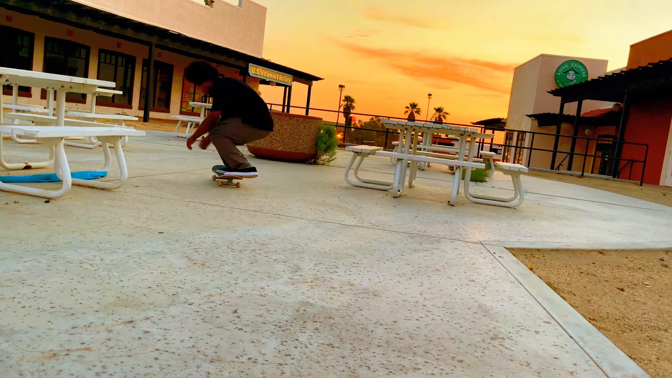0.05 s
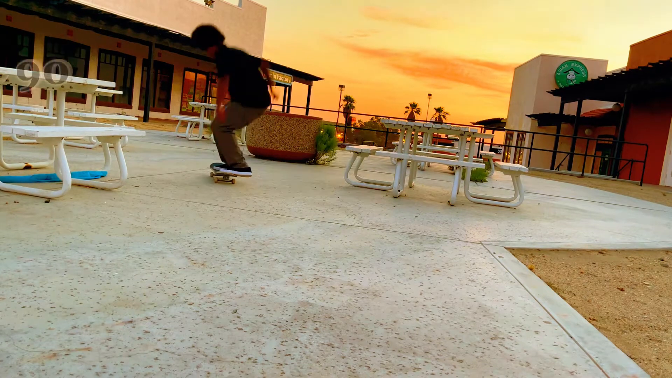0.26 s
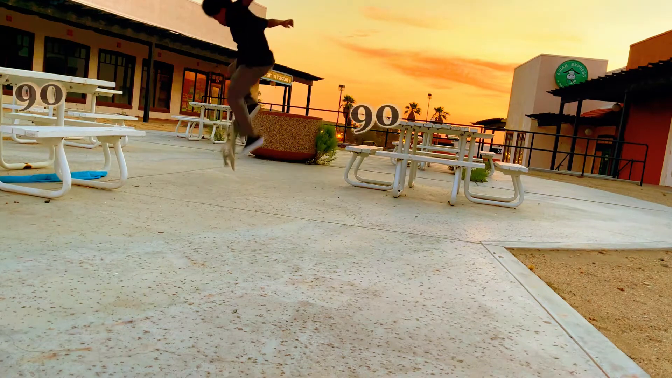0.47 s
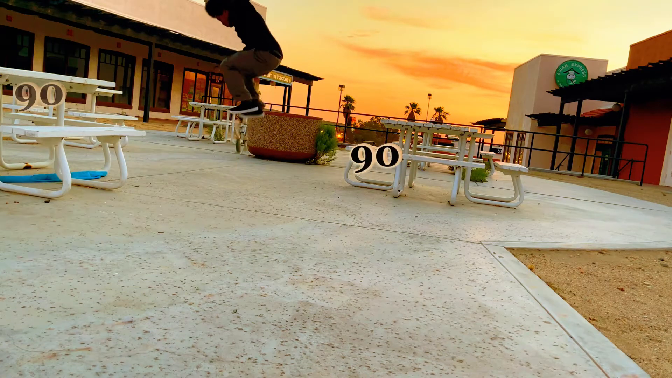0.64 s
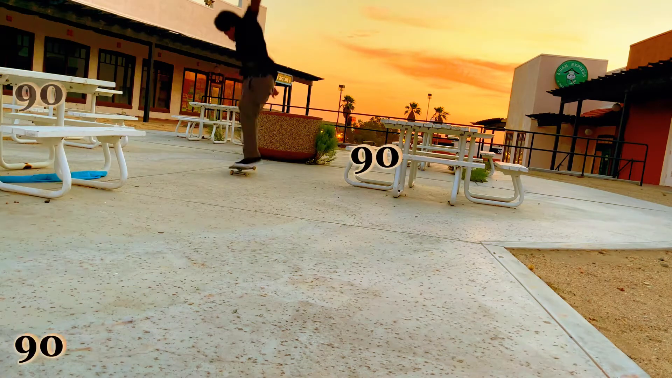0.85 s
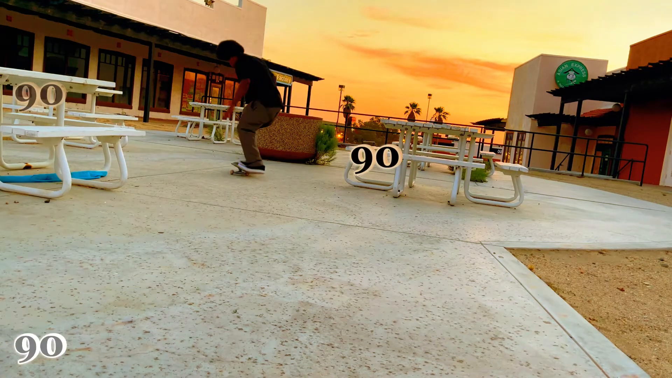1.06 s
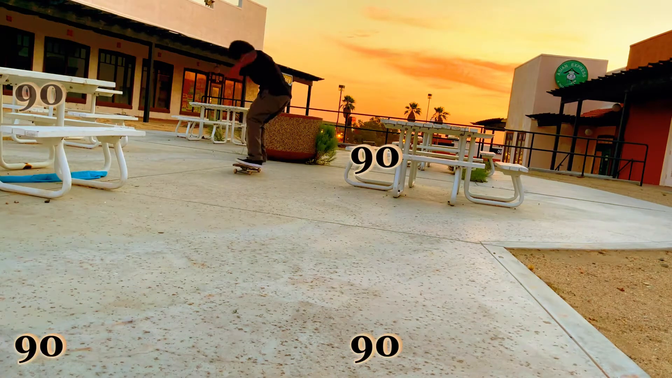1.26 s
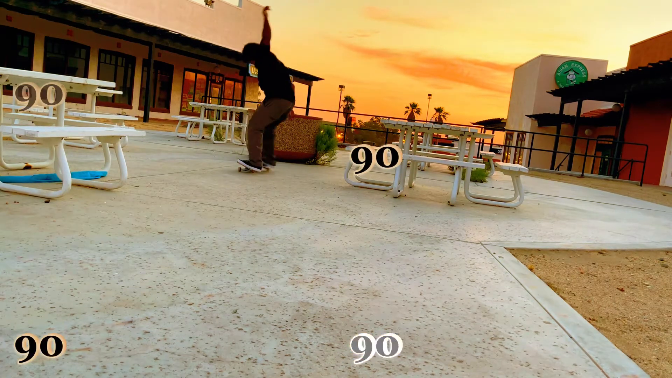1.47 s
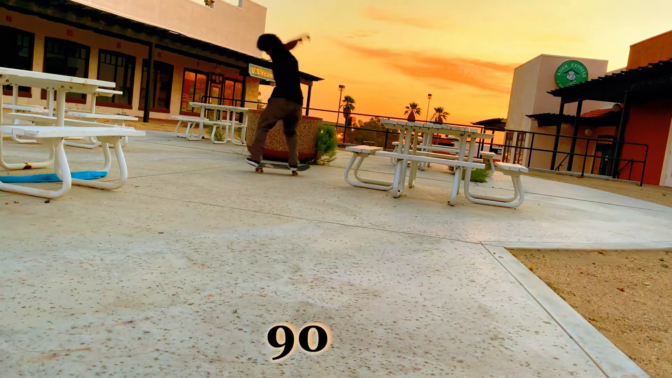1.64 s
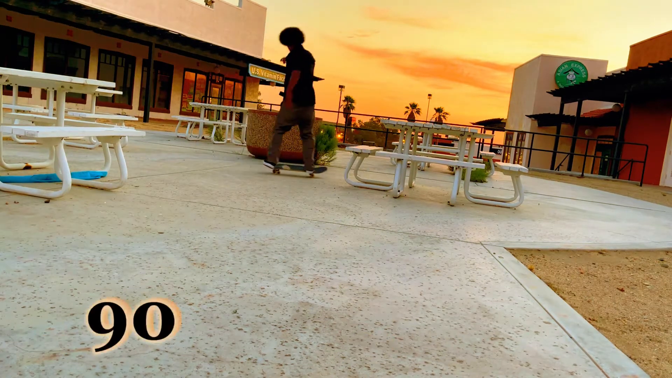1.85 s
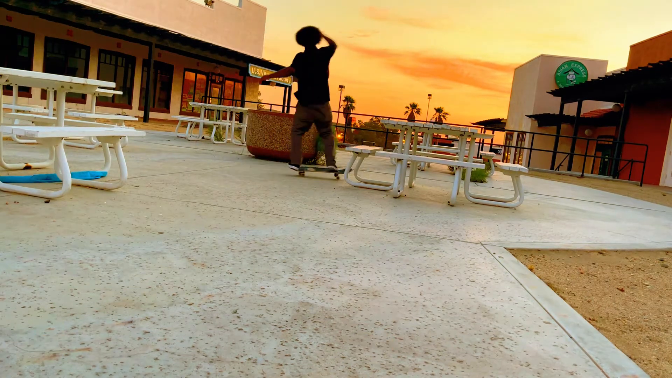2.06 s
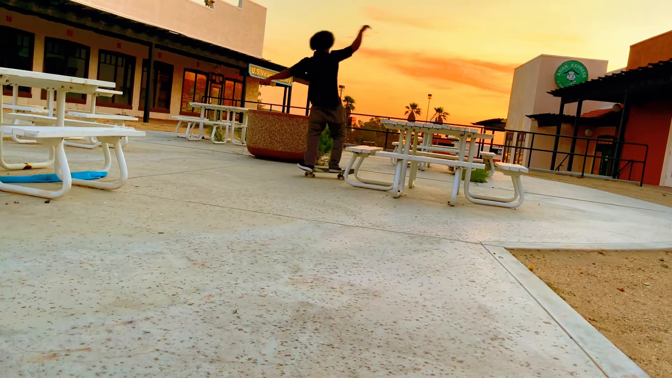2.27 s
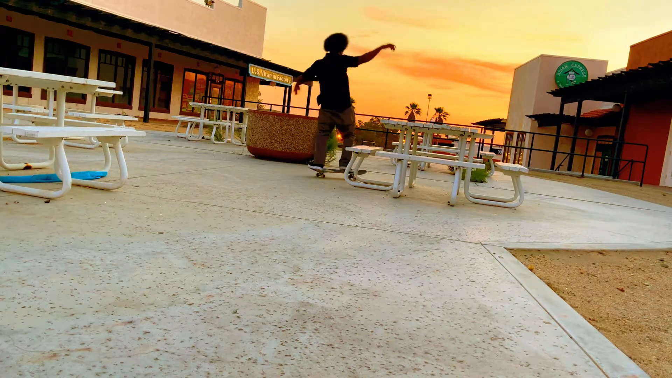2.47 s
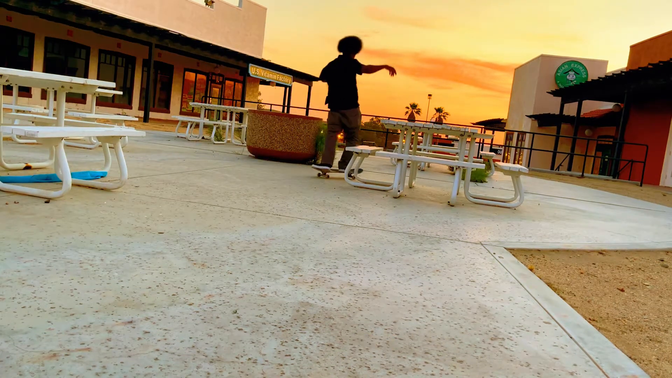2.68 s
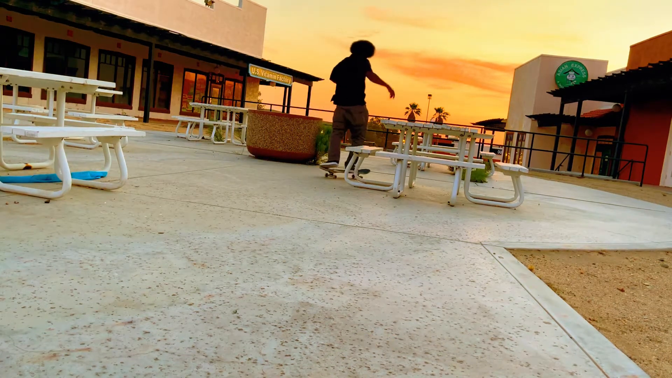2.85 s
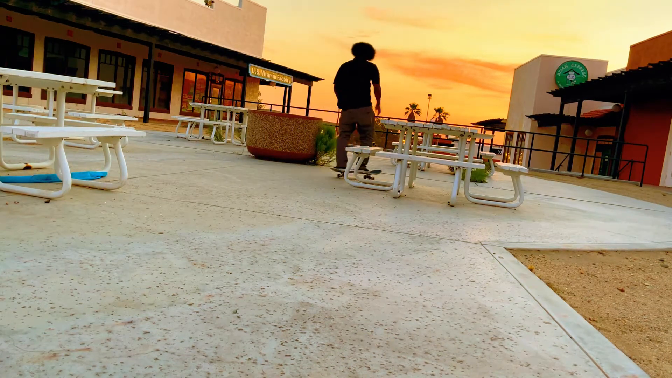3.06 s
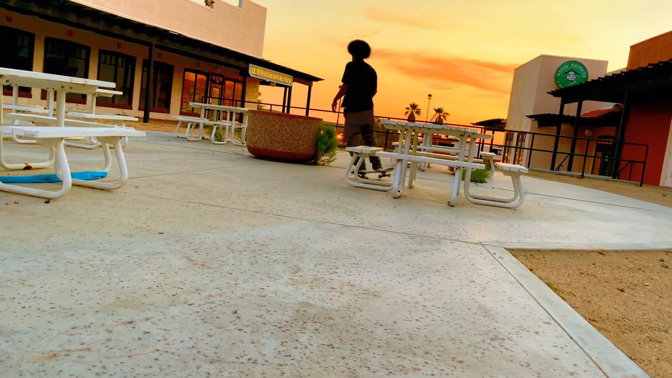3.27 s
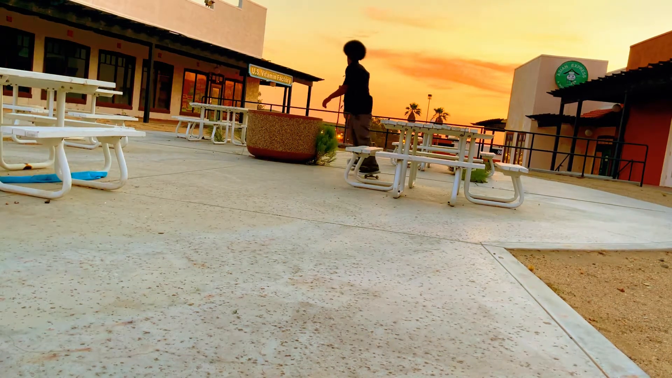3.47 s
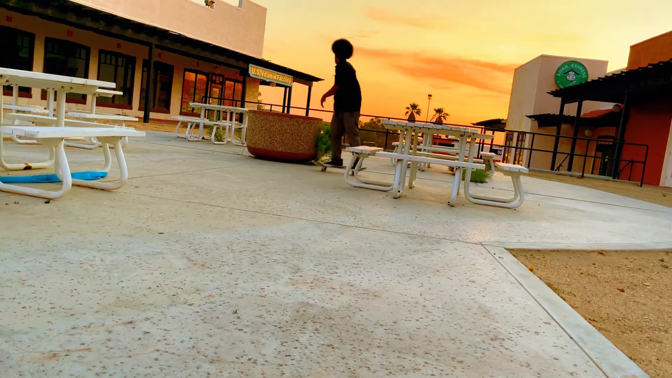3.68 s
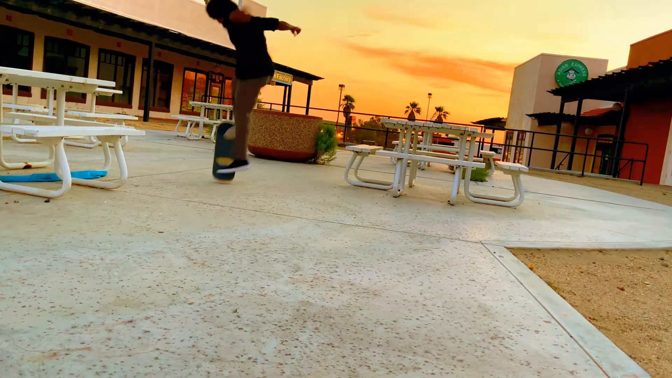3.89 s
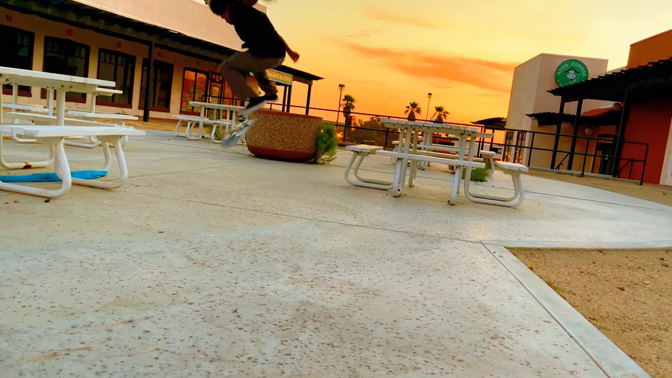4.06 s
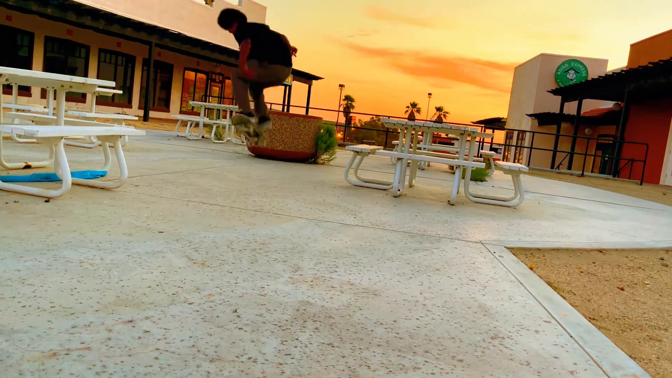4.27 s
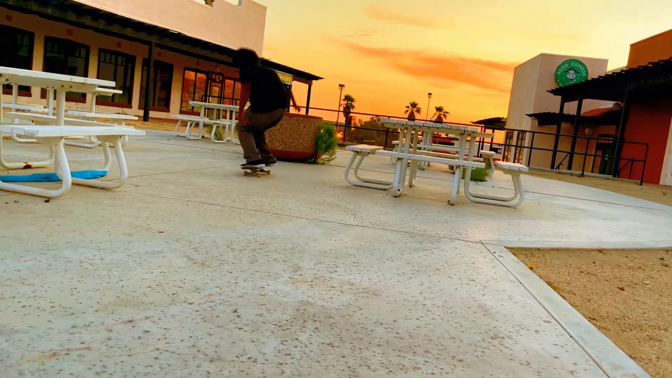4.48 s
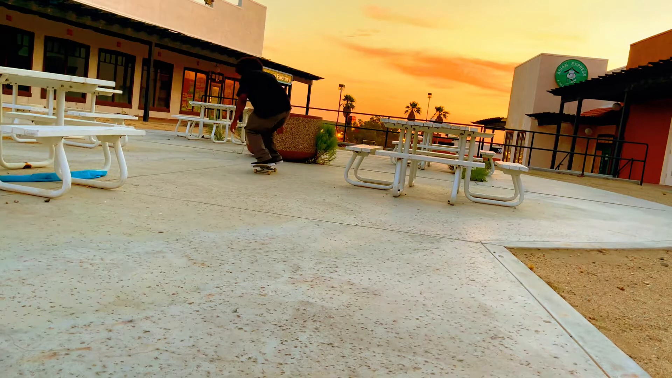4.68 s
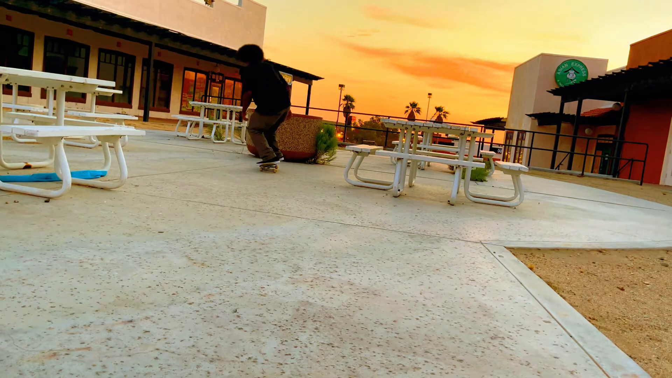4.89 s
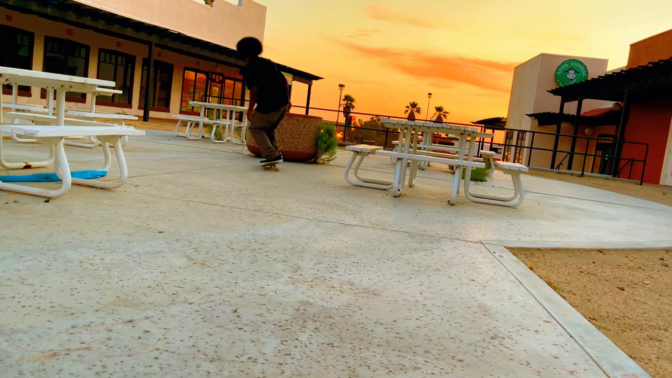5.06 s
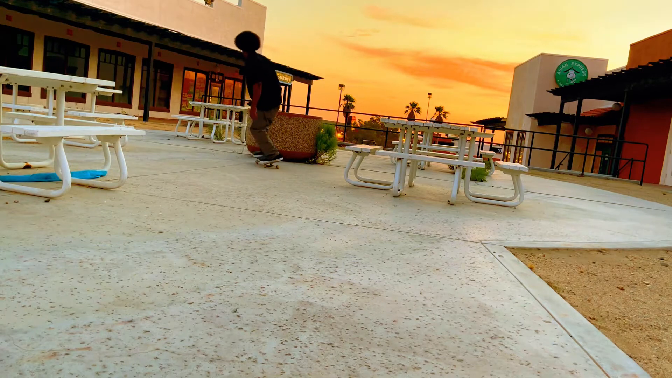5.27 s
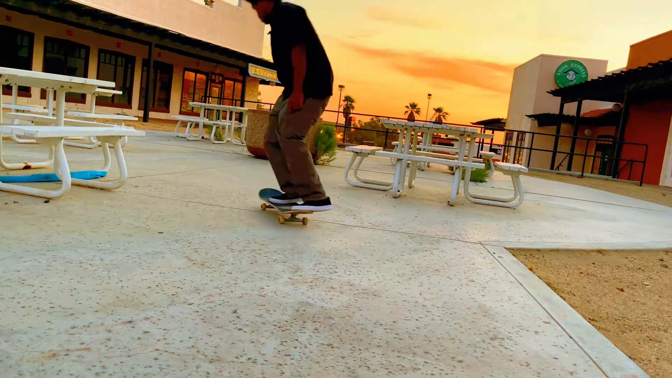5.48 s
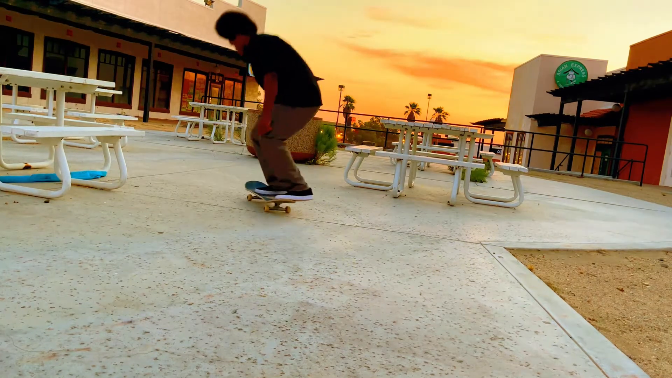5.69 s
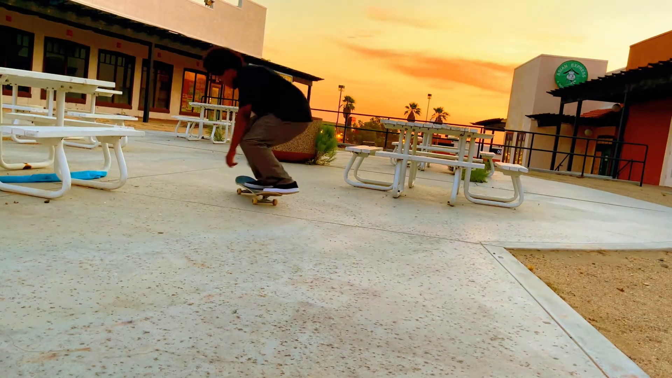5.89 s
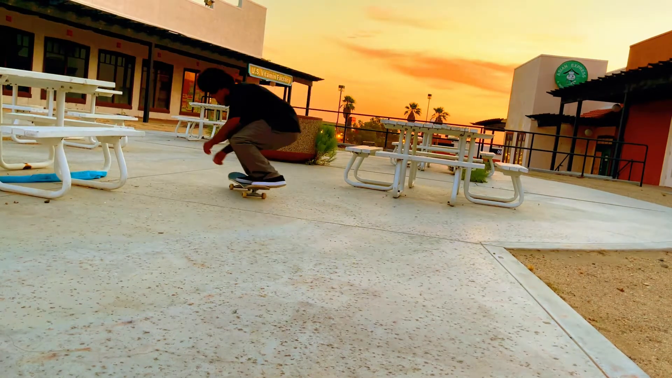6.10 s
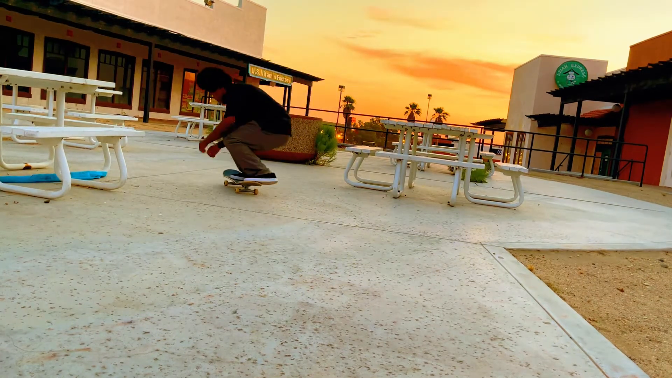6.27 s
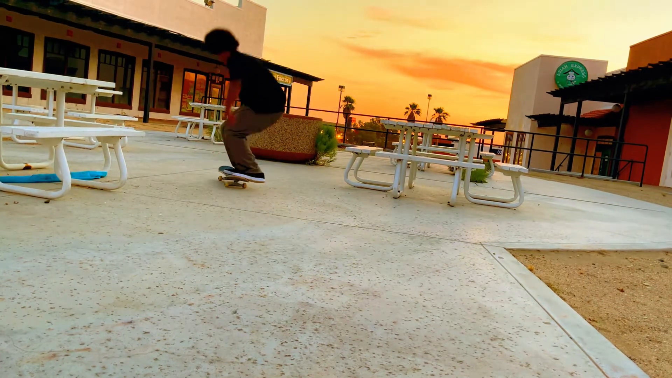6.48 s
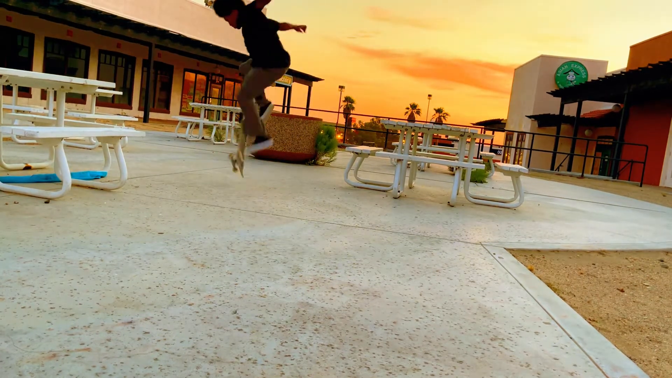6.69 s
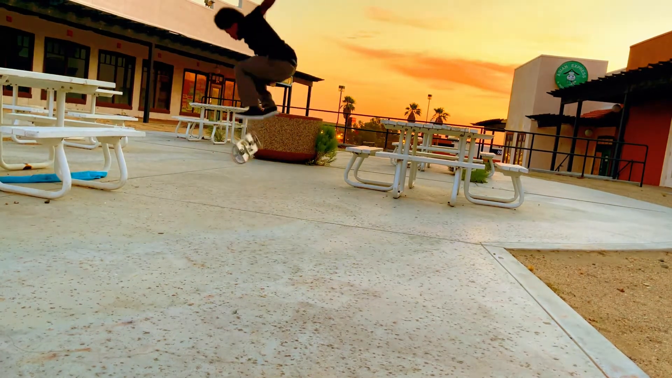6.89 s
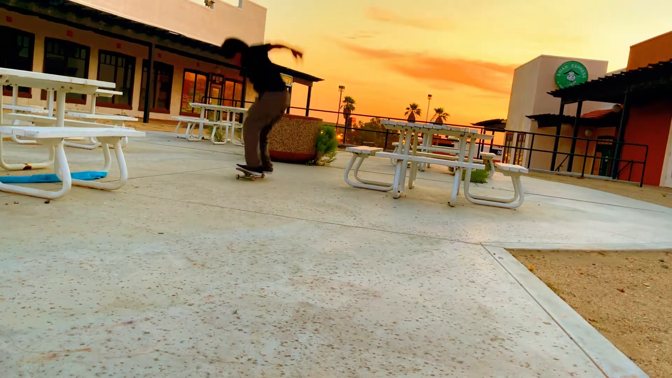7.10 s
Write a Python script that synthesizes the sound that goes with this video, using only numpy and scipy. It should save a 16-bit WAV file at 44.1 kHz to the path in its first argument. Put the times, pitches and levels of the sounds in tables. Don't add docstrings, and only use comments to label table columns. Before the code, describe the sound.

Stereo microphone in open air, some metres from a skateboarder. Dry bright clacks of metal trucks and hollow wooden deck come in groups, each answered by a short echo off building fronts. Between them urethane wheels drone, grind and hiss softly over rough slabs, with grit ticks, brief grip-tape scrapes and low fluttering wind bumps, strongest around the middle and late on.

```python
import sys
import numpy as np
from scipy import signal
from scipy.fft import rfft, irfft, next_fast_len
from scipy.io import wavfile
from scipy.ndimage import uniform_filter1d, map_coordinates

SR = 44100
rng = np.random.default_rng(int(sys.argv[2]) if len(sys.argv) > 2 else 0)


def voltage_ratio(decibels):
    exponent = np.asarray(decibels, float) / 20
    return 10 ** exponent


def waveform_to_disk(signal):
    frames = np.transpose(np.atleast_2d(signal))
    scaled = np.clip(frames, -1, 1) * 32767
    samples = np.round(scaled).astype(np.int16)
    wavfile.write(sys.argv[1], SR, samples)


N = 315006

# (frequency [Hz], width [Hz], level [dB])
DECK_MODES = [(269, 175, 1), (497, 42, 1.5), (655, 203, -1.5)]
# (frequency [Hz], width [Hz], level [dB])
TRUCK_MODES = [(1044, 310, -3), (1590, 560, -2.5), (1926, 480, -2.5), (2870, 1110, -5), (4010, 6100, -15.5)]
# (frequency [Hz], width [Hz], level [dB])
TICK_MODES = [(5200, 8900, -5.5), (9170, 1820, 4.5), (11190, 990, 6.5)]
# (frequency [Hz], width [Hz], level [dB])
WHEEL_MODES = [(897, 210, 7), (1610, 260, -2), (1890, 320, -3.5)]
# (frequency [Hz], level [dB per Hz])
FLUTTER_SPECTRUM = [(90, -62), (180, 2), (300, 1.5), (600, -5.5), (1100, -47), (2500, -52)]


def unit(x):
    return x / np.sqrt(np.mean(x ** 2) + 1e-20)


def along(points, hz):
    f, v = np.transpose(points)
    return np.interp(np.log(hz + 1), np.log(f + 1), v)


def curves(rows):
    s, *cols = np.transpose(rows)
    return [np.interp(np.arange(N) / SR, s, c) for c in cols]


def wobble(rate):
    knots = rng.standard_normal(int(N * rate / SR) + 4)
    return map_coordinates(knots, [np.arange(N) * rate / SR])


def filtered(x, response):
    m = next_fast_len(N + SR // 2)
    hz = np.fft.rfftfreq(m, 1 / SR)
    return irfft(rfft(x, m) * response(hz), m)[..., :N]


def resonant(x, modes, order=1):
    def response(f):
        total = 0
        for k, (c, w, db) in enumerate(modes):
            total = total + (-1) ** k * voltage_ratio(db) * 1j * f * w / (c * c - f * f + 1j * f * w)
        return total ** order
    return filtered(x, response)


def coloured(x, spectrum):
    return unit(filtered(x, lambda hz: voltage_ratio(along(spectrum, hz))))


def pair(alike):
    a, b = rng.standard_normal((2, N))
    turn = np.arccos(np.clip(alike, 0, 1)) / 2
    return np.cos(turn) * a + np.sin(turn) * np.array([b, -b])


def bursts(starts, layers_db, rises, t60s):
    force, t = np.zeros((len(rises), N + SR)), np.arange(SR // 6) / SR
    rise = 1 - np.exp(-t / np.clip(rises, 1e-4, 1)[:, None])
    for s, db, t60 in zip(starts, layers_db, t60s):
        fall = voltage_ratio(db[:, None] - 60 * t / np.clip(t60, .004, .3)[:, None])
        noise = rng.standard_normal((len(rises), len(t)))
        force[:, round(s * SR - 30):][:, :len(t)] += rise * fall * noise
    return force[:, :N]


def ports(x):
    # (frequency [Hz], left ahead by [radians])
    lead = [(0, 0), (1700, .4), (2800, 1.3), (5300, 1.4), (6800, -.3), (7400, 1.4), (8450, 0),
            (10000, -2.7), (11500, -5.5), (13600, -9.4), (15200, -12.6)]
    # (frequency [Hz], left minus right [dB])
    louder = [(200, 0), (700, 1.5), (1700, 1.5), (3300, 2.5), (5300, 5.5), (6900, 5), (7900, 7),
              (9000, -1.5), (11000, 0.5), (13000, 0.5)]

    def response(hz):
        half = voltage_ratio(along(louder, hz) / 2) * np.exp(.5j * np.interp(hz, *np.transpose(lead)))
        return np.array([half, 1 / half])
    return filtered(x, response)


def scatter(x):
    t = np.arange(SR // 40) / SR
    tail = rng.standard_normal(len(t)) * voltage_ratio(-60 * t / 0.097)
    side = signal.fftconvolve(x, tail / np.linalg.norm(tail))[:N]
    return np.array([side, -side])


def fronts(x):
    # (frequency [Hz], time to fall 60 dB [s])
    echo_t60 = [(200, 0.62), (1500, 0.13), (5000, 0.51), (12000, 0.35)]
    out, step = np.zeros((2, N + 2 * SR)), SR // 3
    for at in range(0, N, step):
        hz, t, z = signal.stft(rng.standard_normal((2, SR // 2)), SR, nperseg=256)
        fall = voltage_ratio(-60 * t / along(echo_t60, hz)[:, None])
        tail = signal.istft(z * fall, SR, nperseg=256)[1]
        sides = np.array([tail[0] + 0.28 * tail[1], tail[0] - 0.74 * tail[1]])
        tail = sides / np.linalg.norm(tail[0])
        wet = signal.fftconvolve(x[None, at:at + step], tail, axes=1)
        out[:, at + SR // 100:][:, :wet.shape[1]] += wet
    return out[:, :N]


def heaves():
    # (time [s], frequency [Hz], level [dB], time to fall 60 dB [s])
    swells = [
        (2.947, 74.6, -15, 0.13),
        (2.995, 80, -16, .12),
        (3.195, 95, -18, .1),
        (6.661, 64.5, -20, .2),
    ]
    out, t = np.zeros(N + SR), np.arange(SR // 4) / SR
    for s, hz, db, t60 in swells:
        shape = voltage_ratio(db - 60 * t / t60) * (1 - np.exp(-t / 0.0044))
        out[round(s * SR):][:len(t)] += shape * np.sin(2 * np.pi * hz * t)
    return out[:N]


def whirls():
    # (time [s], peak [dB], starting frequency [Hz])
    swoops = [(2.519, -25, 704), (2.603, -28, 1000), (2.655, -30, 800), (2.728, -27, 970),
              (2.742, -25, 1090), (2.776, -29, 750), (2.898, -21, 1520), (2.926, -21, 850),
              (3.132, -21.5, 1244), (3.15, -19, 910), (3.2, -22, 935), (5.406, -28, 804),
              (5.451, -23.5, 1410), (5.468, -22, 1560), (5.485, -23.5, 1730), (5.547, -23, 910),
              (5.581, -35, 750), (5.618, -28, 1200), (5.645, -19.5, 1074), (5.696, -23, 1100),
              (5.724, -18.5, 1040), (5.757, -25, 1390), (5.82, -17, 1150), (5.866, -26, 1290),
              (5.923, -29, 790), (5.977, -33, 1180), (5.995, -25, 956), (6.516, -28, 801.3),
              (6.527, -24, 905), (6.648, -21, 810), (6.699, -22, 1005), (6.83, -19, 804),
              (6.909, -21.5, 944), (2.98, -25, 800), (3.025, -24, 700), (3.052, -21.5, 850),
              (6.716, -25, 800), (6.772, -33, 1100), (6.797, -25, 750), (6.892, -27, 700),
              (6.934, -24, 950)]
    end_hz, slows_s, t60_s = 138, 0.00399, 0.056
    out, t = np.zeros((2, N + SR)), np.arange(SR // 20) / SR
    chances = rng.standard_normal((len(swoops), 2))
    for (s, db, from_hz), (turn, lean) in zip(swoops, chances):
        hz = end_hz + (from_hz - end_hz) * np.exp(-t / slows_s)
        shape = voltage_ratio(db - 0.5 - 60 * t / t60_s) * (1 - np.exp(-t / 0.0032))
        swoop = shape * np.sin(2 * np.pi * np.cumsum(hz) / SR + turn)
        out[:, round(s * SR):][:, :len(t)] += swoop * voltage_ratio(2 * lean * np.array([[1], [-1]]))
    return out[:, :N]


def eddies():
    # (time [s], peak [dB], thump over peak [dB])
    first_eddies = [(0.464, -30, 13), (0.688, -18, -3), (1.161, -16, -17), (1.189, -17, -3), (1.232, -16, -19),
                    (1.653, -20, 8.5), (2.122, -21.5, 8), (2.602, -21.5, 1), (2.731, -23, -21), (2.872, -16, 3),
                    (2.889, -6, -12), (2.923, -12.5, -2), (3.044, -9, -2), (3.131, -8.5, 1), (3.149, -10, -1.5),
                    (3.199, -13.5, -7), (4.589, -15.5, -29), (4.931, -24, 15), (5.467, -16, -9), (5.545, -22, 2),
                    (5.643, -23, -6), (5.698, -16, 1), (5.724, -10.5, 1), (5.82, -10, -23), (5.865, -12, -11),
                    (5.994, -18.5, 8), (6.423, -14, -7), (6.46, -13, -2), (6.7, -19, -15), (6.831, -14, 4.5)]
    # (time [s], peak [dB], thump over peak [dB])
    more_eddies = [(0.133, -26, -4), (0.61, -30.5, 15.5), (0.657, -25.5, 0), (1.098, -22, -13),
                   (1.137, -31, -25), (1.395, -33.5, 17), (1.915, -23, 5), (1.967, -23.5, 2), (1.999, -23, 5),
                   (2.028, -23, 1.5), (2.297, -27, 9.5), (2.323, -27.5, 15), (2.463, -27.5, 6), (2.775, -27, -9),
                   (2.853, -17.5, 8), (3.113, -23, 15), (3.42, -32.5, 9), (4.536, -17, -21), (5.009, -35, 12),
                   (5.254, -31.5, 13), (5.404, -22, -21), (5.452, -16, -5), (5.483, -16, -12), (5.761, -16, -13),
                   (5.923, -26, 11.5), (5.976, -17.5, -5), (6.291, -31, 4.5), (6.401, -16.5, -3),
                   (6.525, -18, -31), (6.909, -19, -10)]
    s, db, thump_db = np.transpose(first_eddies + more_eddies)
    pushes = np.zeros((3, N + SR))
    lags = np.array([.0015, .005, .011]) * np.exp(0.317 * rng.standard_normal((len(s), 3)))
    signs = np.sign(rng.standard_normal((len(s), 3)))
    at = ((s[:, None] + lags) * SR).astype(int)
    pushes[np.arange(3), at] = signs * voltage_ratio(np.transpose([db, db, db + thump_db]))
    puff, flap, thump = pushes[:, :N]
    push = voltage_ratio(25) * resonant(puff, [(584, 250, 0)], order=2)
    push = push + voltage_ratio(31.0) * resonant(flap, [(280, 220, 0.0095)], order=2)
    push = push + voltage_ratio(40.5) * resonant(thump, [(121, 117, 0.011)], order=2)
    ragged = bursts(s, db[:, None], [.003], np.full((len(s), 1), .035))[0]
    push = push + voltage_ratio(15.0) * resonant(ragged, [(379, 300, 0.015)], order=2)
    push = resonant(push, [(287, 406, 0)])
    return push * voltage_ratio(3 * wobble(30) * np.array([[1], [-1]]))


def wind():
    # (time [s], strength [dB])
    gust_strength = [(0, -38.5), (0.17, -34.5), (0.3, -49.5), (0.7, -29.5), (1.65, -30.5), (1.78, -34.5),
                     (2.7, -38.5), (2.9, -20.5), (3.18, -29), (3.36, -37.5), (3.55, -30), (3.8, -41),
                     (4.6, -32), (5.37, -33.5), (5.79, -24), (6.22, -34), (6.46, -27.5), (7.14, -30)]
    # (frequency [Hz], level [dB per Hz])
    buffet_spectrum = [(13, -51), (22, -4.5), (64, 1.5), (96, -2.5), (125, -2.5), (227, -11.5), (260, -12),
                       (340, -23), (570, -120)]
    strength_db, = curves(gust_strength)
    lumps = wobble(22)
    buffet = coloured(voltage_ratio(2.76 * lumps + 2.8 * wobble(7)) * pair(alike=0.78), buffet_spectrum)
    clumps = voltage_ratio(3 * lumps + 4.5 * wobble(45))
    flutter = coloured(clumps * pair(alike=0.67), FLUTTER_SPECTRUM)
    average_flutter_db, grows = -44, 1
    flutter_db = average_flutter_db + grows * (strength_db - strength_db.mean())
    return voltage_ratio(strength_db - 0.33) * buffet + voltage_ratio(flutter_db) * flutter + eddies()


def ducking(board):
    above_db, hold_s = -12, 0.042
    level = np.sqrt(np.abs(uniform_filter1d(board ** 2, round(hold_s * SR))))
    return 1 / (1 + level / voltage_ratio(above_db))


def runs():
    # (time of crest [s], grind [dB], deck drone [dB], fade [dB/s])
    crests = [(0.45, -45, -54, 41), (0.86, -40.5, -40.5, 33), (1.1, -44.5, -41.5, 43), (1.63, -51, -45, 60),
              (2.659, -48, -44.5, 64), (3.72, -54, -45, 10), (3.92, -50, -59, 66), (4.44, -40, -40.5, 43),
              (4.58, -44, -41, 65), (4.98, -65, -55, 15), (5.21, -60, -54.5, 20), (6.36, -52.5, -48.5, 42),
              (3.2, -56, -63, 82), (6.64, -42.5, -51, 60), (7.12, -43, -42, 10)]
    coast_grind_db, coast_drone_db, rise_s = -63, -50.5, 0.15
    t = np.arange(N) / SR
    airborne_db = np.interp(t, (6.62, 6.9, 6.99, 7.01), [0, -2.5, -2.5, 0])
    power = voltage_ratio(2 * np.array([[coast_grind_db], [coast_drone_db]]) + 2 * airborne_db)
    for s, grind_db, drone_db, fade in crests:
        shape = np.clip(1 + (t - s) / rise_s, 0, 1) * voltage_ratio(-fade * np.maximum(t - s, 0))
        power = power + (voltage_ratio([[grind_db], [drone_db]]) * shape) ** 2
    return 10 * np.log10(power)


def chatter():
    skips_per_s = 260
    skips = (rng.random(N) < skips_per_s / SR) * voltage_ratio(4.9 * rng.standard_normal(N))
    return unit(resonant(skips - skips.mean(), WHEEL_MODES))


def rolling():
    # (time [s], bearing hiss [dB])
    spin = [(0, -56), (0.3, -59.5), (0.5, -69), (0.8, -61), (1.2, -53.5), (1.7, -61), (2.01, -57),
            (2.3, -80), (3.15, -59.5), (3.5, -70), (3.8, -55.5), (4.1, -68), (4.5, -58.5), (5.33, -64),
            (5.37, -52.5), (6.5, -55), (6.85, -75), (7.14, -79)]
    # (frequency [Hz], level [dB per Hz])
    drone_spectrum = [(300, -18.5), (650, 5), (950, 0), (1350, -6), (1900, -15.5), (4000, -46)]
    grind_spectrum = [(600, -1), (930, -7.5), (1350, -6), (1900, -2.5), (2400, -6), (3300, -10),
                      (8500, -19.5), (12500, -37)]
    hiss_spectrum = [(1500, 4), (3500, -7), (4500, 0.5), (6000, -12), (9000, -0.5), (10200, 7), (11300, 11),
                     (12100, -3), (12700, -16), (13300, -51)]
    (grind_db, drone_db), (hiss_db,) = runs(), curves(spin)
    roughness = voltage_ratio(0.93 * wobble(120) + 2.76 * wobble(30))
    drone = coloured(roughness * pair(alike=0.03), drone_spectrum)
    grind = coloured(roughness * pair(alike=0.36), grind_spectrum)
    shudder = coloured(roughness * pair(alike=0.58), FLUTTER_SPECTRUM)
    flicker = voltage_ratio(.9 * wobble(40) + 1.1 * wobble(8))
    hiss = coloured(flicker * pair(alike=0.98), hiss_spectrum)
    shudder_db = -35 + 2.36 * (drone_db + 40.5)
    deck = voltage_ratio(drone_db) * (drone + voltage_ratio(-7.5) * chatter()) + voltage_ratio(shudder_db) * shudder
    return deck + voltage_ratio(grind_db + 1.0) * grind + voltage_ratio(hiss_db + 4.0) * hiss


def singing():
    # (start [s], crest [s], end [s], level [dB])
    songs = [
        (2.58, 2.633, 2.8, -48),
        (4.402, 4.48, 4.58, -44.5),
        (4.5, 4.608, 4.76, -46),
        (4.68, 4.95, 5.43, -54.5),
    ]
    # (frequency [Hz], width [Hz], level [dB])
    song_modes = [(1730, 520, 2), (2380, 500, -7)]
    t = np.arange(N) / SR
    load = 0
    for start, crest, end, db in songs:
        load = load + voltage_ratio(db) * np.interp(t, [start, crest, end], [0, 1, 0])
    grain = voltage_ratio(3 * wobble(90) + 1.3 * wobble(25))
    return load * unit(resonant(grain * rng.standard_normal(N), song_modes, order=2))


def bright_ticks(rows):
    s, db = np.transpose(rows)
    return voltage_ratio(1.0) * resonant(bursts(s, db[:, None], [.0005], np.full((len(s), 1), .03))[0], TICK_MODES)


def grit():
    # (time [s], peak [dB])
    grains = [(1.2186, -39), (1.2794, -33), (1.5714, -29), (1.8921, -52), (1.9155, -44), (1.9405, -38.5),
              (1.9594, -47), (2.0083, -38), (2.1375, -43), (2.1864, -34), (2.2508, -49), (2.4169, -49),
              (4.4019, -32), (4.6394, -40), (4.7294, -46), (4.7735, -43), (4.8105, -45), (4.9546, -44),
              (5.0554, -50), (5.1058, -48), (5.1507, -44), (5.1991, -42), (5.2545, -46), (5.2819, -43),
              (5.3507, -45)]
    return bright_ticks(grains)


def clinks():
    # (time [s], peak [dB])
    knocks = [
        (.7495, -12),
        (.7715, -22),
        (.7945, -27),
        (.8175, -29),
    ]
    return bright_ticks(knocks)


def squeaks():
    # (time [s], length [s], from frequency [Hz], to frequency [Hz], level [dB])
    slips = [(0.4, 0.004, 4840, 4740, -24), (0.584, 0.007, 3000, 2900, -38),
             (0.612, 0.0074, 2700, 2600, -36), (.95, .01, 2700, 2700, -45), (2.453, 0.026, 3750, 3500, -47),
             (2.462, .012, 4700, 4400, -54), (2.474, 0.027, 3120, 2900, -49),
             (2.503, .025, 3000, 2900, -57), (3.042, 0.03, 3800, 3500, -54),
             (3.045, 0.025, 3150, 3050, -54), (6.284, 0.067, 3300, 3100, -55),
             (6.607, .008, 4900, 4700, -44), (6.626, .01, 4500, 4200, -42)]
    out = np.zeros(N)
    for s, length, from_hz, to_hz, db in slips:
        n = round(length * SR)
        slide = 2 * np.pi * np.cumsum(np.linspace(from_hz, to_hz, n)) / SR
        turn = slide + np.cumsum(0.17 * rng.standard_normal(SR // 10))[:n]
        out[round(s * SR):][:n] += voltage_ratio(db) * np.hanning(n) * (np.sin(turn) + 0.15 * np.sin(2 * turn))
    return out


def flicks():
    # (start [s], end [s], level [dB])
    drags = [
        (0.313, 0.412, -35.5),
        (3.838, 3.923, -36),
        (4.221, 4.282, -45),
        (6.535, 6.61, -34),
    ]
    t, stroke = np.arange(N) / SR, np.zeros(N)
    for start, end, db in drags:
        stroke += voltage_ratio(db) * np.interp(t, [start, start + 0.0042, end - .004, end], [0.014, 1, 0.44, 0])
    return stroke * unit(resonant(voltage_ratio(1.2 * wobble(110)) * rng.standard_normal(N), TICK_MODES))


def humming():
    # (time [s], level [dB], time to fall 60 dB [s])
    flights = [
        (.335, -38, 0.91),
        (3.845, -39, 0.93),
        (6.575, -48, 0.78),
    ]
    # (frequency [Hz], width [Hz], level [dB])
    free_modes = [(706, 60, -9), (1345, 55, 0), (2330, 190, -6.5), (3130, 150, -10), (4600, 170, -15)]
    t = np.arange(N) / SR
    shake = 0
    for s, db, t60 in flights:
        shake = shake + voltage_ratio(db - 60 * np.abs(t - s) / t60) * (t > s)
    return shake * voltage_ratio(2.3 * wobble(35)) * unit(resonant(rng.standard_normal(N), free_modes))


def rings():
    # (time [s], frequency [Hz], level [dB], time to fall 60 dB [s])
    board_rings = [(0.32, 265, -17, 0.047), (4.218, 287, -17.5, 0.057), (4.309, 300, -14.5, 0.083),
                   (3.828, 266, -17.5, 0.04), (0.32, 1350, -32, 0.3), (1.021, 1650, -7.5, 0.033),
                   (2.5385, 1703, -5, 0.028), (3.826, 1000, -28.5, 0.17), (4.308, 1550, -9, 0.052),
                   (4.356, 1850, -19.5, 0.056), (0.33, 1360, -28, .06), (.405, 1350, -32.5, 0.13),
                   (6.999, 1100, -14, 0.044), (7, 1497, -4.5, 0.047), (0.36, 1350, -25, 0.06),
                   (7.017, 1700, -7, 0.044), (6.567, 1110, -18, 0.034), (7.106, 1650, -30, 0.058)]
    # (time [s], frequency [Hz], level [dB], time to fall 60 dB
    # [s])
    more_rings = [(.321, 693, -11.5, 0.033), (.322, 1230, -9, 0.029), (0.34, 1200, -18, .05),
                  (.338, 2200, -19, .03), (.7605, 698, -5.5, 0.052), (0.76, 366, -20, 0.046),
                  (.776, 740, -14, 0.042), (.8045, 815, -25, 0.044), (1.01, 800, -21, 0.045),
                  (1.022, 807, -19, 0.064), (1.036, 253, -18, 0.049), (1.248, 1110, -22, 0.028),
                  (1.266, 1490, -24, 0.028), (1.543, 580, -24.5, 0.073), (1.555, 1640, -21, 0.037),
                  (3.97, 2400, -36, 0.041), (4.047, 2150, -41, .05), (4.472, 1240, -35, 0.036),
                  (2.54, 884, -9, 0.044), (2.548, 343, -17, 0.041), (3.824, 673, -8.5, 0.036),
                  (3.824, 1300, -11, 0.026), (3.841, 1324, -20.5, 0.059), (4.217, 2314, -7.5, 0.025),
                  (4.215, 3000, -11, 0.03), (4.218, 455, -14, 0.034), (4.246, 598, -17.5, 0.044),
                  (4.327, 1008, -11, 0.039), (4.328, 242, -15, 0.049), (4.343, 900, -22, 0.1),
                  (6.977, 895, -38, .04), (6.989, 1830, -32, 0.045), (7.001, 808, -15, .04),
                  (7.017, 834, -12, .04), (7.048, 1710, -29, .05)]
    out, t = np.zeros(N + SR), np.arange(SR // 3) / SR
    for s, hz, db, t60 in board_rings + more_rings:
        wander = hz * 8e-5 * np.cumsum(rng.standard_normal(len(t)))
        shape = voltage_ratio(db - 60 * t / t60) * (1 - np.exp(-t / 0.00065))
        out[round(s * SR):][:len(t)] += shape * np.sin(2 * np.pi * hz * t + wander)
    return out[:N] * voltage_ratio(2.4 * wobble(70))


def crunches():
    # (time [s], level [dB], time to fall 60 dB [s])
    weights = [
        (.742, -13, .2),
        (1.012, -17, .13),
        (1.2475, -9, 0.038),
        (1.542, -14, .08),
    ]
    s, db, t60 = np.transpose(weights)
    force = bursts(s, db[:, None], [.003], t60[:, None])[0]
    return resonant(resonant(force, DECK_MODES + TRUCK_MODES), WHEEL_MODES)


def clacks():
    # (time [s], peak [dB], metal
    # tick [dB], time to fall 60 dB [s])
    contacts = [(0.3202, -16.5, -7, 0.03), (0.324, 3, -24, 0.016), (0.337, -14.5, -8.5, 0.035),
                (0.7374, -9.5, -6.5, 0.037), (2.539, -8.5, -11.5, 0.024), (3.823, -6, -35, 0.034),
                (3.832, -19, -14, 0.055), (3.8415, -14, -17, 0.034), (4.216, -10, -14, 0.037),
                (4.244, -17, -15, 0.046), (4.3265, -2.5, -12, 0.025), (6.547, -8.5, -21, 0.047),
                (6.5661, -14, -13, 0.029), (7.0918, -24, -22, 0.038)]
    # (time [s], peak [dB], deck boom [dB], time to fall 60 dB [s])
    slams = [(0.749, -9, -8, 0.035), (0.7596, -2, -3.5, 0.028), (0.776, -10, -7, 0.019),
             (0.8043, -17.5, -3.5, 0.049), (1.0098, -10.5, 0.5, 0.014), (1.0215, -10, -6, 0.031),
             (1.0394, -20.5, 1.5, 0.026), (1.2472, -26.5, 3.5, 0.035), (1.266, -24, -9.5, 0.041),
             (1.541, -16.5, -19, 0.044), (1.5549, -15.5, -8, 0.049), (2.547, -14, -2.5, 0.043),
             (3.526, -18.5, -14.5, 0.037), (3.5705, -24, -11.5, 0.05), (4.306, -9, -0.5, 0.047),
             (4.3124, -8, 0, 0.0092), (4.3201, -16, -15, 0.059), (4.3424, -17, 2.5, 0.022),
             (7.0003, -6.5, -5.5, 0.024), (7.006, -4.5, -8, 0.011), (7.016, -9, -2, 0.028),
             (7.0221, -11.5, -2, 0.022), (7.031, -34, 6, .032)]
    # (time [s], peak [dB], metal tick [dB])
    rattles = [(0.235, -39.5, -5.5), (0.3665, -34, -4), (0.414, -33, -11), (0.4537, -29.5, -25),
               (0.544, -33, -25), (0.617, -37, 7.5), (0.649, -41.5, 4), (1.195, -48, 2), (1.42, -37.5, 2),
               (1.524, -48, 3), (2.0957, -33, 3.5), (2.176, -30.5, -5.5), (2.8987, -34.5, -16),
               (2.908, -33.5, -13), (3.71, -36, -8), (3.7405, -40, 1.5), (3.8685, -41.5, 10),
               (3.9717, -34, -34), (4.047, -38, -29), (4.2615, -34.5, 1), (4.929, -36, -9),
               (5.3484, -43, -28), (5.539, -38, -3), (5.6075, -38, -6), (6.469, -34, -4.5),
               (6.527, -39, -8), (6.6291, -33, -13), (5.868, -43, -4), (6.772, -35, -24), (6.991, -26, -34),
               (7.0626, -33, -21)]
    contact_boom_db = -10
    slam_tick_db = -7
    rattle_boom_db, rattle_t60_s = -10.5, 0.048
    snap_db = 9.5
    rows = [(s, db, contact_boom_db, tick_db, t60) for s, db, tick_db, t60 in contacts]
    rows += [(s, db, boom_db, slam_tick_db, t60) for s, db, boom_db, t60 in slams]
    rows += [(s, db, rattle_boom_db, tick_db, rattle_t60_s) for s, db, tick_db in rattles]
    s, db, boom_db, tick_db, t60 = np.transpose(rows)
    levels = np.transpose([db + boom_db, db, db + tick_db])
    deck, trucks, tick = bursts(s, levels, [.003, .001, .0004], np.outer(t60, [1.3, .95, .7]))
    trucks[((s + .0008) * SR).astype(int)] += voltage_ratio(db + snap_db)
    tick[((s + .0003) * SR).astype(int)] += voltage_ratio(db + tick_db + snap_db - 6.5)
    deck = resonant(resonant(deck, DECK_MODES), [(480, 1630, 0)])
    trucks = resonant(resonant(trucks, TRUCK_MODES), [(1740, 6600, 0)])
    return voltage_ratio(21.5) * deck + voltage_ratio(11.5) * trucks + voltage_ratio(6.5) * resonant(tick, TICK_MODES)


def scene():
    struck = clacks() + rings() + humming()
    board = resonant(struck, [(1920, 45000, 0)])
    space = voltage_ratio(-11.0) * scatter(board) + voltage_ratio(-14.5) * fronts(board)
    near = board + space + flicks() + squeaks() + grit() + rolling()
    gusts = (wind() + whirls() + heaves()) * voltage_ratio([[.4], [-.4]])
    return ports(near + singing() + clinks() + crunches()) + ducking(board) * gusts


def gated(x):
    # (frequency [Hz], level [dB])
    gate = [(9500, -98), (9900, -98), (10250, -82), (10500, -98), (12200, -96), (12800, -88), (13900, -80),
            (15300, -92)]
    hz, t, z = signal.stft(np.array([x[0] + x[1], x[0] - x[1]]), SR, nperseg=2048)
    power = (np.abs(z[:, :-1] / 2) ** 2).reshape(2, 128, 8, -1).mean(axis=2)
    smooth = np.repeat(uniform_filter1d(power, size=3, axis=2), 8, axis=1)
    hz = hz[:-1, None]
    faint = (smooth < voltage_ratio(2 * along(gate, hz))) & (hz > gate[0][0])
    kept = z * np.pad(~faint, ((0, 0), (0, 1), (0, 0)))
    total, apart = signal.istft(kept, SR, nperseg=2048)[1][:, :N]
    return np.array([total + apart, total - apart]) / 2


def band_limit(x):
    return signal.sosfilt(signal.butter(12, 16500, fs=SR, output="sos"), x)


def record(dry):
    # (frequency [Hz], level [dB])
    capsule = [(25, -14.5), (60, 2), (11300, -1), (12100, -3.5), (13000, -8.5), (14000, -14), (15500, -10),
               (16200, -57), (17000, -94)]
    heard = filtered(dry, lambda hz: voltage_ratio(along(capsule, hz)))
    heard = heard / (1 + heard ** 6) ** (1 / 6)
    return band_limit(gated(heard))


dry = scene()
out = record(dry)
waveform_to_disk(out)
```